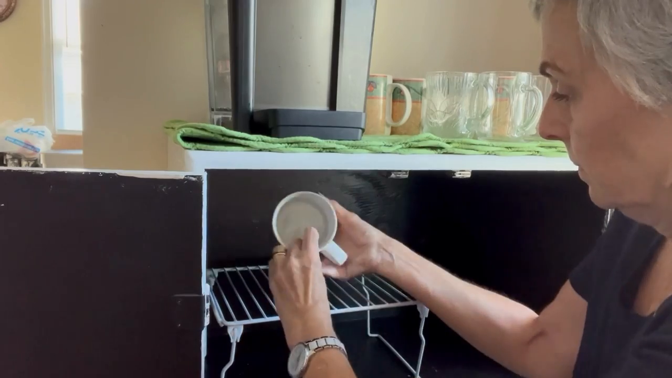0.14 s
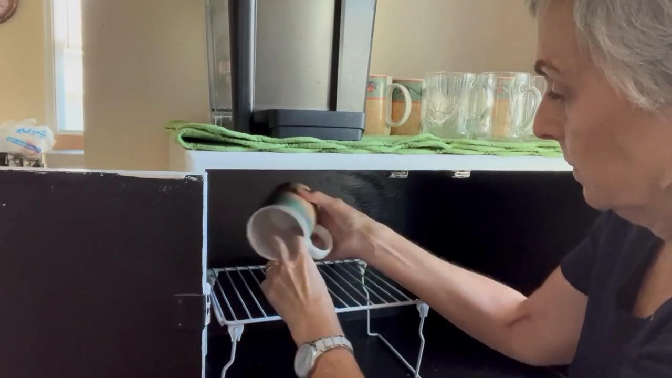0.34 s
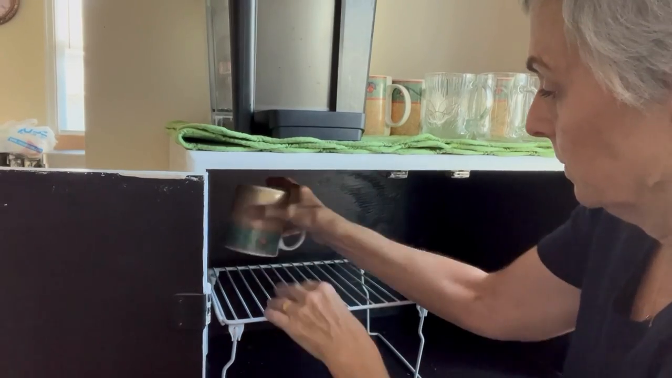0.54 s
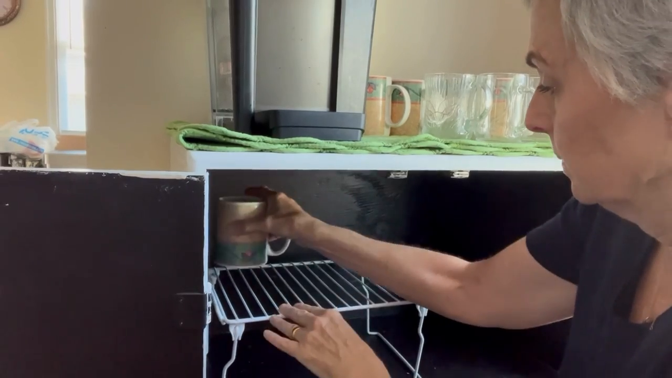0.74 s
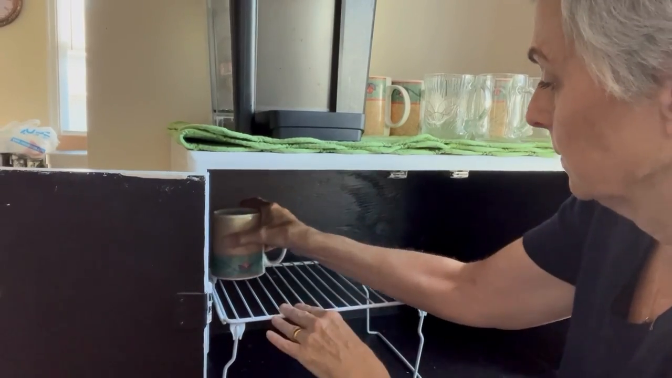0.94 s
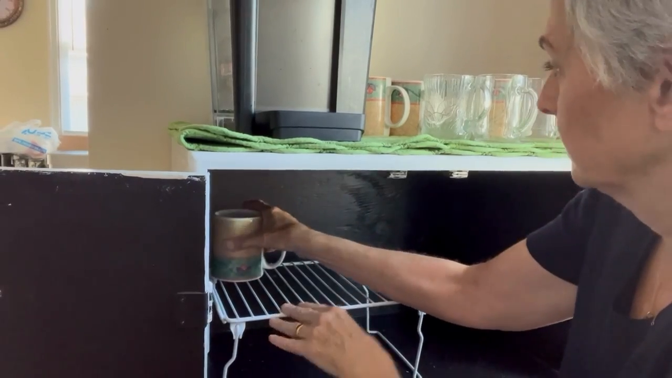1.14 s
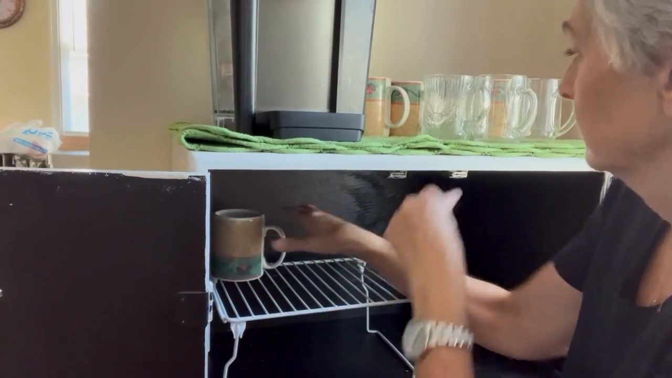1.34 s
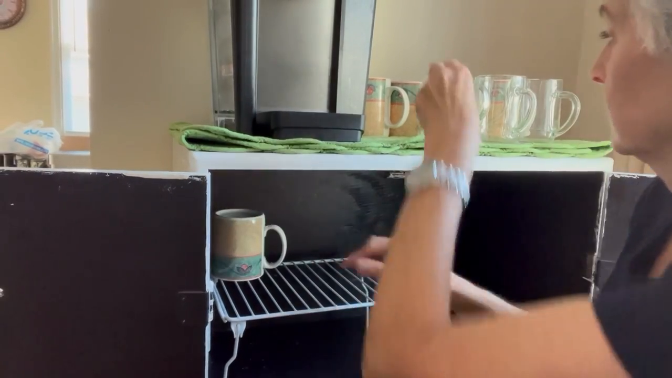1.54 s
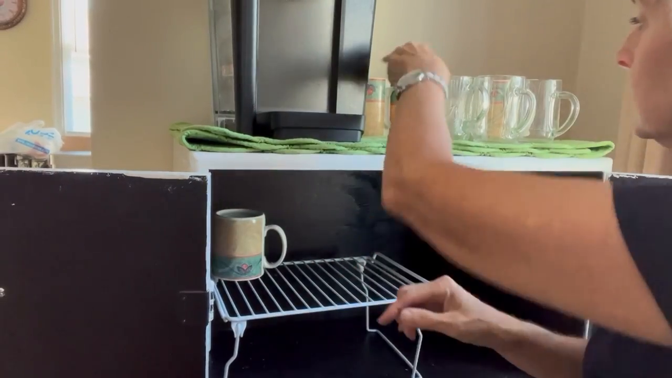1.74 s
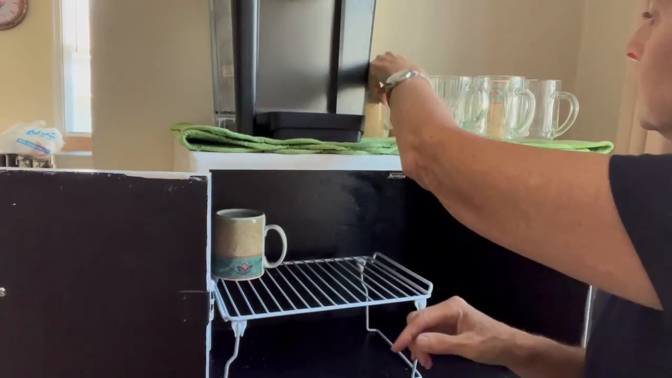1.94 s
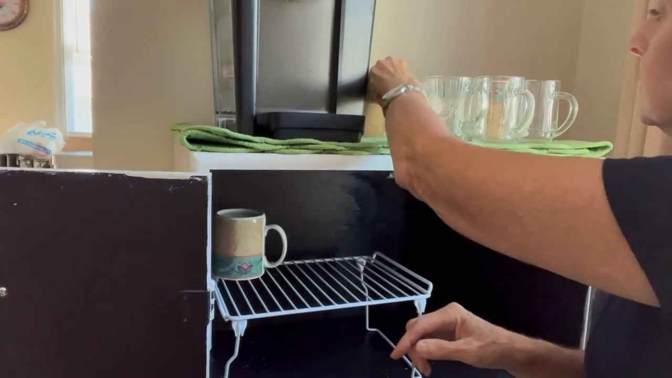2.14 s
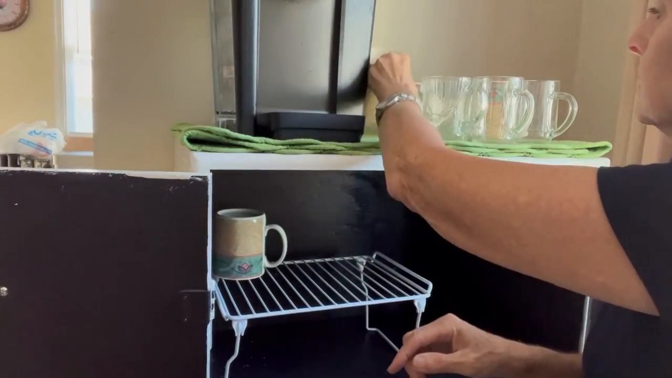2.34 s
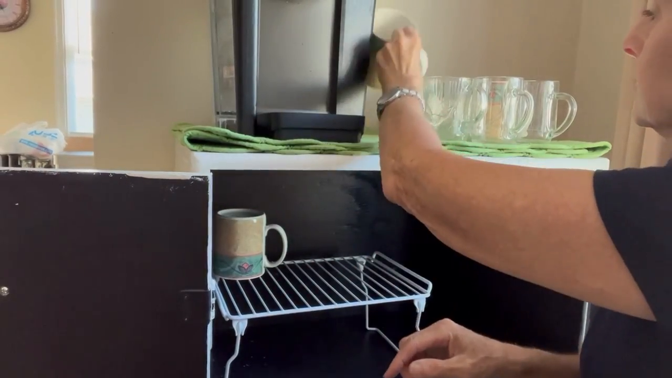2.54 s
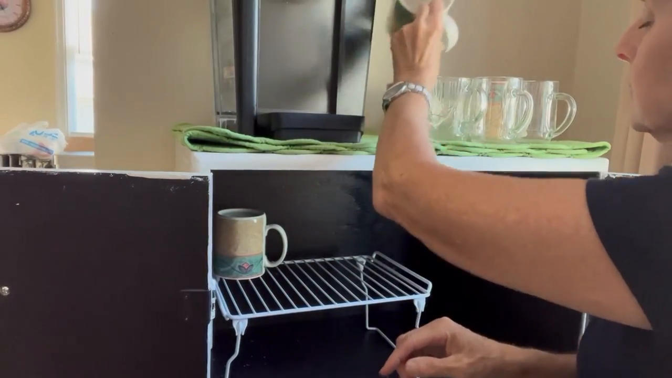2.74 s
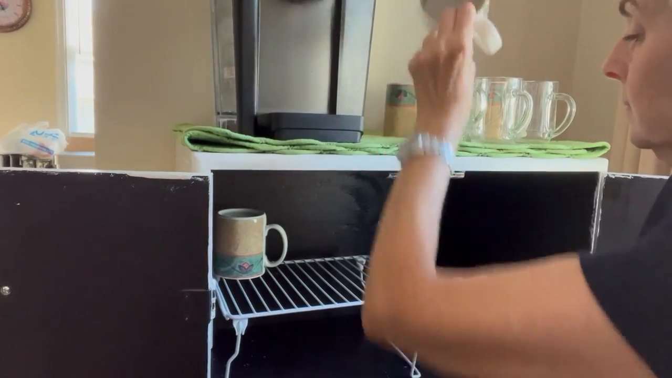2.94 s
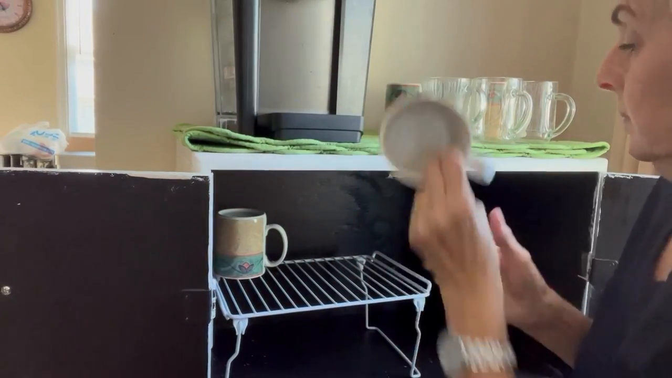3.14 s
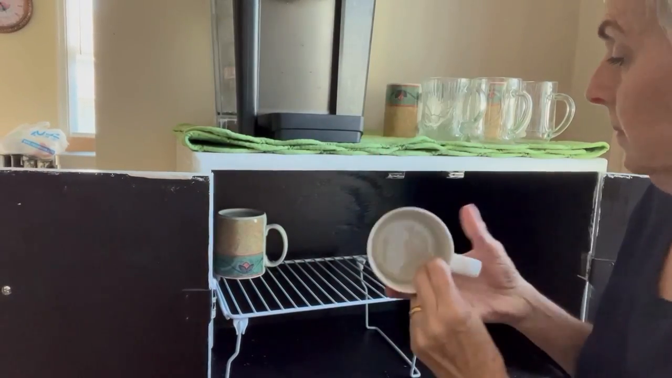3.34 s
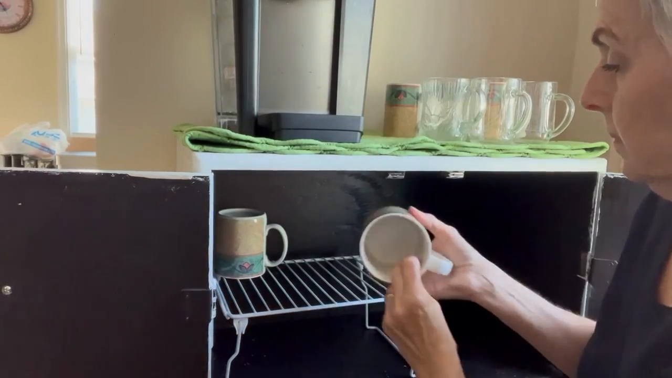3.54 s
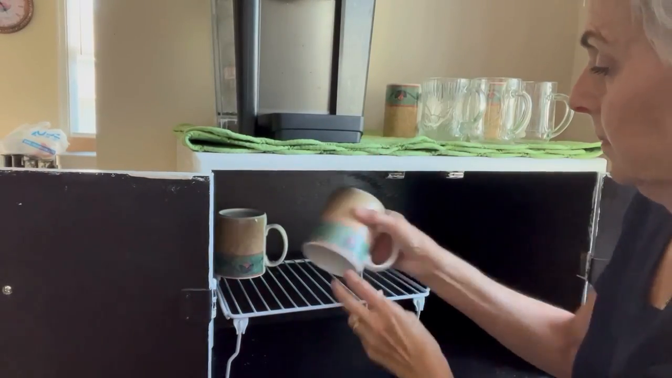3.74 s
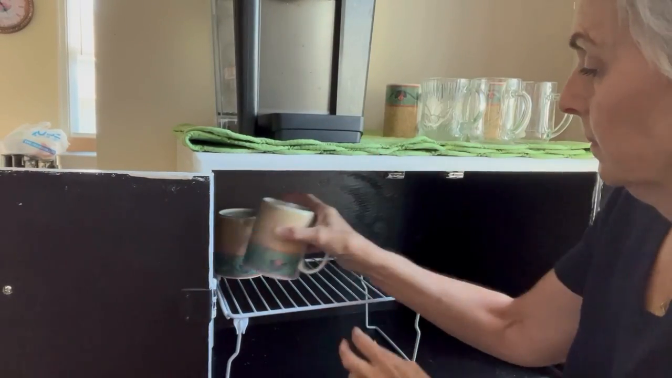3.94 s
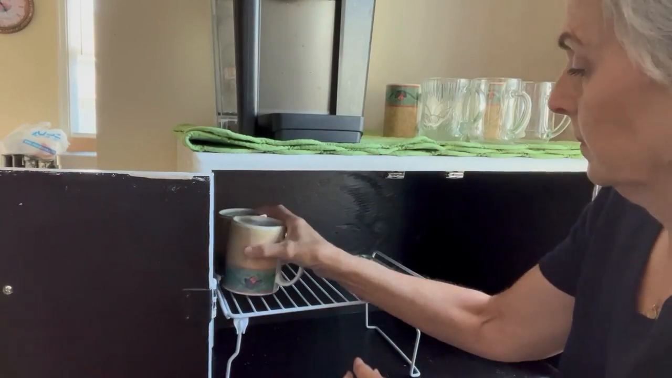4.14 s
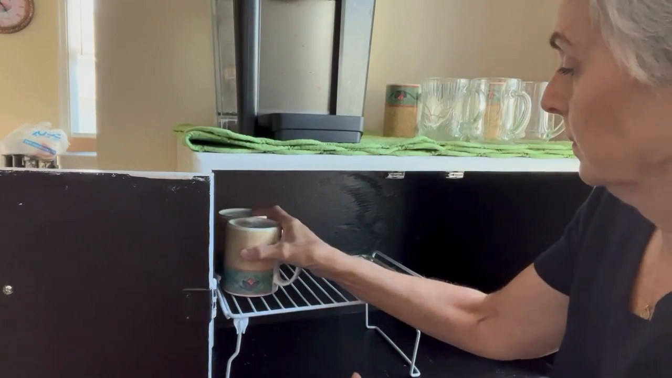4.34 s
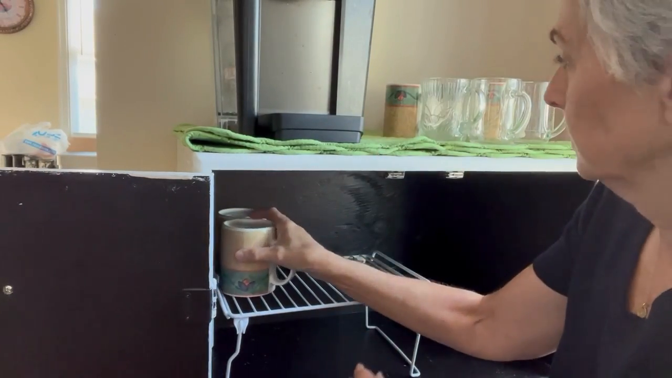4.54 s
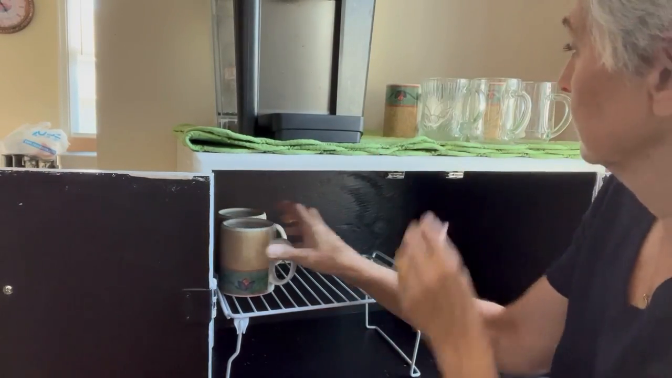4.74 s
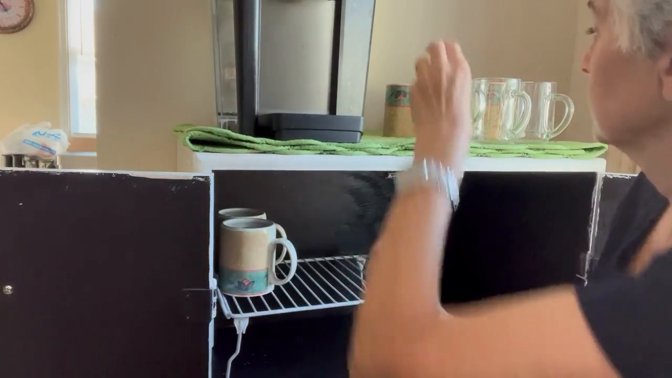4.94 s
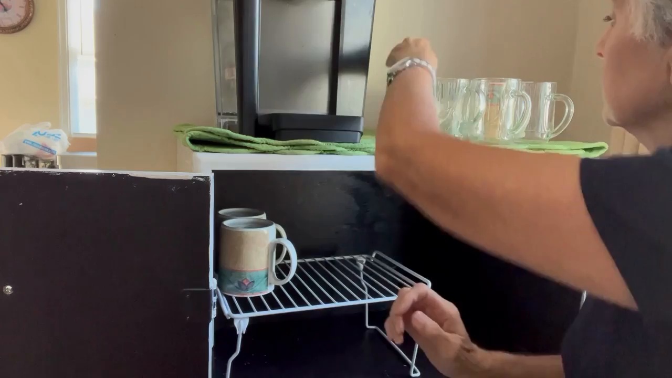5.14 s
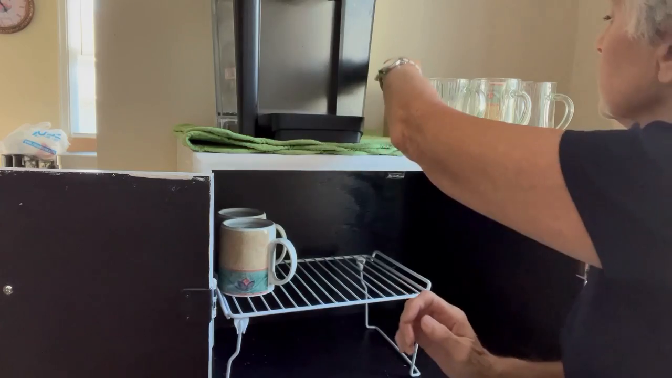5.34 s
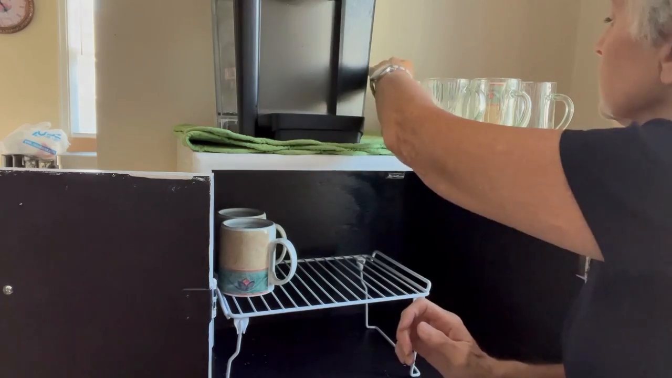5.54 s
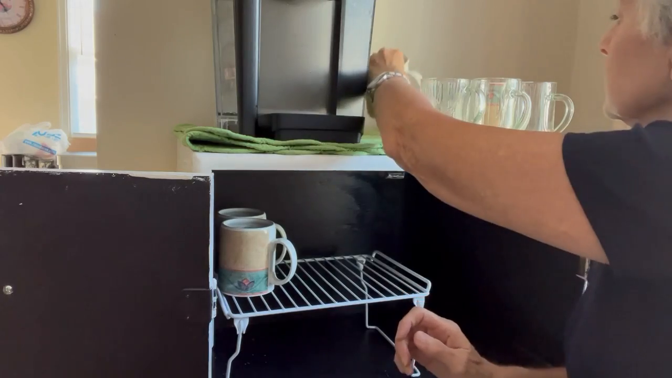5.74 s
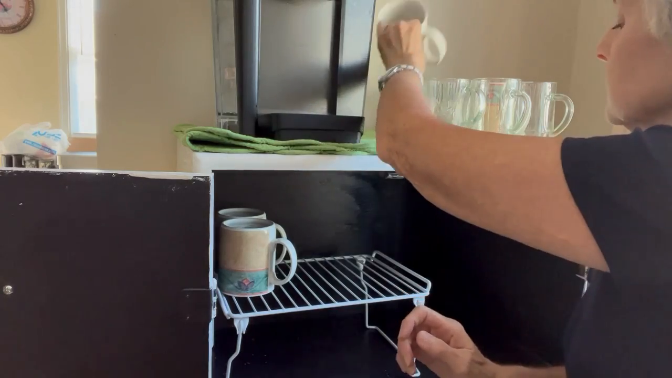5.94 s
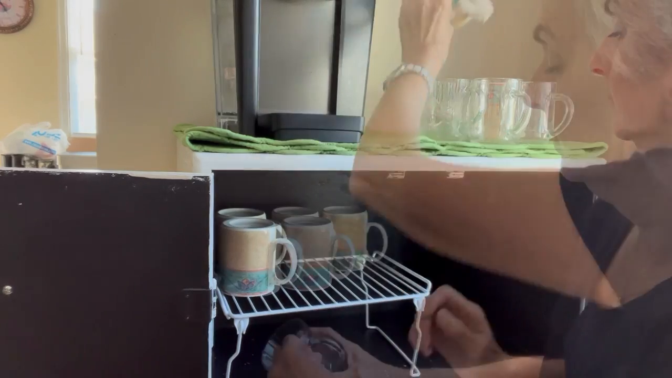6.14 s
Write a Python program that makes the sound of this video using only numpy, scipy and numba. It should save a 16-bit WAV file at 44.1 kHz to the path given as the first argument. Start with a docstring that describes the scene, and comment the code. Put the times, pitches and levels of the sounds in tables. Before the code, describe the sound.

Close, quiet small room with low hum and a faint clock tick. Fingers brush a mug, then it lands on a wire shelf in a quick metallic clatter. Another mug is tapped and dragged off a cloth with a thud, gritty scrape and high singing ring. It is set down softly and clinks sharply against the first, followed by faint finger rubs.

```python
"""Mugs moved onto a shelf

Ceramic mugs are turned in the fingers, dragged off a cloth-covered cabinet top and set on a wire shelf inside.
Mugs, shelf and cabinet are sets of fading tones, started by blows or fed by rubbing noise; most blows also rattle.
A clock ticks, mains hum and a far engine are sums of sine waves, and shaped noise is the air of a small room."""
import sys
import numpy as np
from scipy import signal
from scipy.fft import rfft, irfft, next_fast_len
from scipy.io import wavfile
from scipy.ndimage import uniform_filter1d
from numba import njit

SR = 44100
rng = np.random.default_rng(int(sys.argv[2]) if len(sys.argv) > 2 else 0)


def persist_wave(psi):
    """Save psi, clipped to +-1, as 16-bit WAV."""
    counts = np.round(np.clip(psi, -1, 1) * 32767).astype(np.int16)
    wavfile.write(sys.argv[1], SR, np.atleast_2d(counts).T)


def natural_amplitude(level_db):
    """Convert a level in decibels to a linear amplitude factor, elementwise."""
    exponent = np.asarray(level_db, float) / 20
    return 10 ** exponent


N = 272979  # length in samples
M = next_fast_len(N)  # padded length for fast filtering
T = np.arange(N) / SR  # time in seconds
F = np.fft.rfftfreq(M, 1 / SR) + 0.0009  # frequency in Hz, kept above zero for logarithms

# Tones of the mug lifted off the cloth. Each row: frequency in Hz, relative level in dB, 60 dB fade in seconds.
LIFTED_MUG = [(2492, -9, .12), (2557, -1, .48), (2605, -8, .06), (2697, -11, .4), (2880, -19, .12),
              (4250, -20, .25), (4484, -16, .45), (5430, -21, .28), (6896, -23, .1), (7440, -11, .2),
              (8190, -21, .1), (8455, -23, .12), (9146, -25, .1), (9545, -26, .2), (10400, -21, .22),
              (11050, -23, .1), (11210, -22, .14), (11610, -23, .15), (12830, -16, .13), (13350, -19, .14),
              (13680, -21, .1), (14675, -17, .13)]
# The same mug pressed down: shifted, shorter tones. Each row: frequency in Hz, relative level in dB,
# 60 dB fade in seconds.
PRESSED_MUG = [(2470, -14, .1), (2590, -4, .05), (2700, -6, .25), (2840, -11, .06), (3000, -14, .05),
               (3400, -17, .05), (3860, -20, .06), (4250, -23, .08), (5440, -16, .16), (6890, -22, .06),
               (7450, -11, .14), (8460, -30, .08), (9540, -26, .15), (10400, -21, .2), (11200, -25, .14),
               (11600, -29, .12), (12830, -17, .13), (13350, -23, .14), (13690, -26, .1), (14680, -20, .11)]
# Taps on that mug. Each row: start in seconds, ring level in dB, contact corner in Hz, rattle level in dB.
MUG_TAPS = [(1.997, -40.5, 12000, -40), (2.029, -59, 4970, -65), (2.136, -51, 12200, -50),
            (2.257, -47, 6740, -36.5), (2.358, -51, 5000, -52), (2.394, -47, 5000, -54),
            (2.49, -49, 6000, -43), (2.514, -45, 7030, -45), (2.545, -45, 4970, -45)]
# Mug foot dragged over the cloth: it creeps, is pulled harder, then lifts off.
# Each row: time in seconds, friction level in dB.
DRAG = [(2.132, -55), (2.174, -52), (2.25, -51), (2.32, -45.5), (2.36, -41.5), (2.41, -37.5), (2.45, -39.5),
        (2.53, -40), (2.57, -70)]
# Tone colour of the cloth noise. Each row: frequency in Hz, relative level in dB per Hz.
SCRAPE = [(200, 5.5), (400, 2), (900, -4), (1500, 3), (2100, -25), (3000, -2), (4000, -7.5), (7500, -18.5),
          (12000, -50), (16000, -43)]
# The rim sings under the drag, rising as the mug is pressed harder.
# Each row: time in seconds, pitch in Hz, rms level in dB; both waver a little.
RIM_SONG = [(2.14, 2555, -54), (2.19, 2564, -47.5), (2.26, 2560, -48), (2.33, 2572, -43), (2.38, 2586, -43),
            (2.425, 2608, -41), (2.47, 2595, -46), (2.53, 2560, -55)]
# Tones of the mug set on the shelf. Each row: frequency in Hz, relative level in dB, 60 dB fade in seconds.
SHELVED_MUGS = [(1480, -3, .022), (1846, -6, .025), (2417, -15, .1), (2482, 1, .1), (2495, -14, .35),
                (2615, 0, .09), (2645, -2, .1), (2638, -16, .4), (4290, -22, .05), (4334, -22, .36),
                (7192, -17, .09), (8021, -13, .13), (9232, -24, .1), (10470, -16, .13), (11060, -16, .13),
                (11380, -22, .12), (12950, -22, .12), (14440, -27, .12)]
# Tones of the neighbour it strikes, low ones damped by the wires. Each row: frequency in Hz, relative level
# in dB, 60 dB fade in seconds.
STRUCK_MUG = [(1244, -2, .02), (1530, -1, .018), (1846, -4, .02), (3280, -5, .02), (3596, -14, .04),
              (5335, -18, .17), (6589, -12, .12), (6654, -11, .11)]
# Mug against mug. Each row: start in seconds, ring level in dB, contact corner in Hz, rattle level in dB,
# neighbour's ring level in dB.
MUG_CLINKS = [(4.518, -55.5, 4000, -61.5, -70), (4.537, -27.5, 9220, -28.5, -32.5),
              (4.552, -37, 4000, -52, -51), (4.574, -45, 6070, -35, -29.5), (4.6008, -42, 7140, -35, -35.5),
              (4.626, -51, 5030, -48.5, -49)]
# The second mug sings faintly in the hand on its way in. Each row: time in seconds, rubbing level in dB.
CARRY = [(3.86, -90), (4.0, -91), (4.13, -85), (4.18, -80)]
# Tones of the shelf wires. Each row: frequency in Hz, relative level in dB, 60 dB fade in seconds.
SHELF_WIRES = [(988, -5, .1), (1190, -9, .06), (1340, -8, .07), (1701, -4, .075), (1793, -9, .07),
               (2000, -7, .04), (2089, -7, .04), (2186, -4, .08), (2471, -11, .05), (2643, -11, .1),
               (2970, -8, .05), (3180, -9, .04), (3580, -11, .05), (3780, -11, .05), (4150, -12, .03),
               (4296, -9, .05), (4550, -10, .03), (4800, -9, .03), (6000, -9, .035), (6270, -11, .04)]
# Tones of the shelf frame. Each row: frequency in Hz, relative level in dB, 60 dB fade in seconds.
SHELF_FRAME = [(188, -12, .15), (240, -9, .18), (342, 2, .13), (395, -2, .1), (443, -5, .12),
               (495, -7, .08), (571, -8, .08), (672, 0, .09), (743, -8, .06)]
# Landings on the shelf. Each row: start in seconds, wire level in dB, contact corner in Hz, rattle level in dB,
# frame level in dB, pitch of the struck wire in Hz.
SHELF_KNOCKS = [(0.76, -66.5, 2220, -72, -62, 1800), (.951, -52.5, 8960, -49.5, -41, 4630),
                (.959, -49.5, 5000, -50.5, -28.5, 3000), (.966, -41.5, 3000, -51.5, -28, 1660),
                (.978, -46, 4000, -55, -27.5, 3000), (.992, -49, 2500, -60, -30.5, 1700),
                (1.008, -51, 2000, -61, -31.5, 1700), (1.025, -58, 1980, -59, -28.5, 1000),
                (1.041, -50, 9000, -50.5, -31.5, 4420), (1.05, -43.5, 4500, -50, -38, 2210),
                (1.068, -46.5, 3000, -60, -30, 2200), (1.197, -64.5, 2500, -67, -52, 1750),
                (4.197, -52, 6850, -61.5, -43, 4300), (4.207, -50.5, 3500, -63.5, -46, 1900),
                (4.307, -57.5, 2200, -66.5, -49.5, 1700), (4.432, -52.5, 3460, -59.5, -46.5, 2040),
                (4.447, -53, 3000, -59.5, -48, 1400), (4.472, -49.5, 2500, -59, -43.5, 1800),
                (4.49, -54.5, 2500, -61.5, -46, 1400)]
# Tones of a loose shelf leg. Each row: frequency in Hz, relative level in dB, 60 dB fade in seconds.
SHELF_LEG = [(1102, 0, 1.2), (1124, -9, 2.0), (1160, -6, .6), (1390, -13, 1.2), (2266, -10, .12),
             (2783, -11, .22)]
# Blows on the leg as the first mug settles. Each row: start in seconds, ring level in dB, contact corner in Hz.
LEG_BLOWS = [(.99, -56, 3000), (1.078, -44, 2520)]
# Tones of the cabinet. Each row: frequency in Hz, relative level in dB, 60 dB fade in seconds.
CABINET = [(143, -22, 0.05), (163.2, 4, 0.12), (239.4, -9.5, 0.35), (297.5, 16.5, 0.028),
           (328, -16.5, 0.11), (359.8, -2.5, 0.2), (414, 0.5, 0.091), (553.6, -3, 0.073), (717, 8, 0.028),
           (1070, -20.5, 0.27), (1480, -27.5, 0.22)]
# Thuds on the cabinet. Each row: start in seconds, ring level in dB, contact corner in Hz.
CABINET_THUDS = [(.763, -24.5, 300), (0.776, -28, 250), (0.799, -31, 250), (2.258, -23.5, 800),
                 (2.269, -26.5, 700), (2.283, -30.5, 795), (2.311, -31, 800), (2.346, -32.5, 796),
                 (2.362, -36.5, 800)]
# Tones of a mug gripped in the hand. Each row: frequency in Hz, relative level in dB, 60 dB fade in seconds.
HELD_MUG = [(2000, -7, .015), (3400, -12, .015), (5200, -10, .08), (6250, -13, .05), (7200, -9, .08),
            (8100, -8, .08), (9146, 0, .1), (10300, -13, .08), (13680, -1, .1), (14750, -7, .06)]
# Fingernails on the mug. Each row: start in seconds, ring level in dB, contact corner in Hz, rattle level in dB.
NAIL_TAPS = [(.165, -49, 14200, -55), (0.372, -78, 14000, -83.5)]
# Fingers slipping on the glaze. Each row: start in seconds, hold in seconds, level in dB,
# share that rings the mug from 0 to 1, darkness from 0 to 1.
FINGERS = [(0.051, 0.076, -65.5, 0.1, 0.08), (0.163, 0.0031, -54, 0.12, 0.38), (0.373, .01, -77, 0.7, .15),
           (1.94, 0.032, -75.5, 0.17, 0.65), (3.31, .065, -71, 0.54, 0), (3.415, 0.15, -71, 0.36, 0.09),
           (3.821, 0.034, -59, 0.1, 0), (3.94, .01, -74, .02, .05), (5.979, 0.069, -73, 0.14, 0),
           (6.052, 0.067, -57.5, 0, 0.12), (6.154, 0.039, -55.5, 0.01, 0.29)]
# Bright skin hiss. Each row: frequency in Hz, relative level in dB per Hz.
SKIN_BRIGHT = [(2000, -48), (5000, -31), (8000, -5), (11500, -6.5), (13500, 4), (15000, -3), (16000, 2.5)]
# Dark skin hiss. Each row: frequency in Hz, relative level in dB per Hz.
SKIN_DARK = [(1000, -19), (2200, 4.5), (4000, 6.5), (6500, 8), (9000, -54), (14000, -12)]
# Tones of a glass. Each row: frequency in Hz, relative level in dB, 60 dB fade in seconds.
GLASS = [(2650, 3.5, 0.11), (3000, -1, 0.082), (5400, -21, .06), (6500, -16, 0.08)]
# Taps on the glass. Each row: start in seconds, ring level in dB, contact corner in Hz, rattle level in dB.
GLASS_TAPS = [(5.236, -57, 8064, -73)]
# Tone colour of every rattle. Each row: frequency in Hz, relative level in dB per Hz.
RATTLE = [(200, -0.5), (700, 8), (1500, 7.5), (3000, -4), (6000, -8), (11000, -8.5), (16000, -11)]
# Tones of the clock case. Each row: frequency in Hz, relative level in dB, 60 dB fade in seconds.
CLOCK_CASE = [(3100, -7, .012), (3650, 0, .016), (4100, -4, .012), (5600, -11, .01)]
# How long the room's echo lasts. Each row: frequency in Hz, 60 dB fade in seconds.
ROOM_T60 = [(150, 0.47), (1000, 0.35), (4000, 0.21), (12000, 0.3)]
# Tone colour of the room's echo. Each row: frequency in Hz, level in dB.
ROOM_COLOUR = [(60, -13), (200, -3), (600, 7), (4000, 2.5), (8000, -3), (16000, -13.5)]
# What each source sends into the room, in dB: cabinet top, held mug, shelved mugs, shelf, cabinet.
ROOM_DB = (-8, -4.5, -9, -8, -8)
# Phase between the channels. Each row: frequency in Hz, lead of the right channel in radians.
CHANNEL_TURN = [(300, 0.044), (1400, 0.55), (2400, 1.4), (4500, 2.23), (6000, 2), (7500, .2), (16000, .05)]
# Far engine. Each row: time in seconds, firing rate in Hz, then the levels of orders one, two and three in dB;
# rate and levels waver a little.
ENGINE = [(1.4, 51.26, -56, -67, -70), (2.2, 52.73, -51, -78, -86), (2.52, 57.18, -44, -71, -47.5),
          (3.39, 58.6, -49.5, -50.5, -62), (3.55, 62.55, -53, -48, -66), (3.85, 64.86, -49.5, -48.5, -63.5),
          (4.6, 67.9, -57.5, -53, -62.5), (5.12, 68.66, -61, -45, -65), (5.75, 68.96, -60, -50.5, -68.5),
          (6.19, 66.3, -62, -60, -76)]
# Mains hum. Each row: frequency in Hz, rms level in dB, around which it drifts.
MAINS = [(60, -55), (120, -54)]
# Room air, sum of both channels. Each row: frequency in Hz, relative level in dB per Hz.
AIR_MID = [(15, -54.5), (25, -36.5), (40, -15.5), (58, -6), (92, -8.5), (130, -3.5), (170, -11), (256, -13),
           (400, -21), (659, -25.5), (850, -36.5), (1300, -45.5), (2410, -57), (5000, -62), (16000, -65)]
# Room air, difference of the channels. Each row: frequency in Hz, side minus mid in dB.
AIR_SIDE = [(60, -11.5), (110, -10), (200, -7), (380, -2), (700, 0.5), (1290, 0.5), (2380, 1), (4400, 1.5),
            (8120, -8.5), (15000, -7.5)]
# Low resonances of the room. Each row: frequency in Hz, width in Hz, boost in dB.
AIR_MODES = [(74.7, 16, 8), (258, 27, 6), (308, 20, 4.5), (386.8, 21, 14), (491.5, 20, 7), (660, 17, 12),
             (705, 26, 11.5), (1110, 51, 5)]

TAP_FADE_S = 0.0084  # how fast the rattle of a light tap dies away


def on_log(hz, table):
    """Read a table of Hz and value on a log-frequency axis."""
    table_hz, value = np.transpose(table)
    return np.interp(np.log(hz), np.log(table_hz), value)


def colour(x, table, top_hz=99200.0):
    """Filter by a dB shape scaled so that white noise keeps its level, rounding off above top_hz."""
    n = next_fast_len(len(x))
    hz = np.fft.rfftfreq(n, 1 / SR) + 1e-3
    gain = natural_amplitude(on_log(hz, table)) / (1 + (hz / top_hz) ** 2)
    gain = gain / np.sqrt(np.mean(gain ** 2))
    return irfft(rfft(x, n) * gain, n)[:len(x)]


def track(table):
    """Read curves against time; also give a soft-edged gate that is 1 inside their span and 0 outside."""
    s, *columns = np.transpose(table)
    inside = uniform_filter1d(((T > s[0]) & (T < s[-1])) * 1., size=600)
    return inside, [np.interp(T, s, column) for column in columns]


def walk(rate):
    """Smooth random wandering: levels held for 1 / rate seconds, then averaged twice."""
    hold = int(SR / rate)
    steps = np.repeat(rng.standard_normal(N // hold + 1), hold)
    return 1.36 * uniform_filter1d(uniform_filter1d(steps, hold), hold)[:N]


def pair(x, pan_db):
    """Make left and right: left is louder by pan_db, and the phase of the upper mids differs between them."""
    turn = np.exp(.5j * on_log(F, CHANNEL_TURN) * np.array([[-1], [1]]))
    return irfft(rfft(x, M) * turn, M)[:, :N] * natural_amplitude(np.array([[pan_db], [-pan_db]]) / 2)


@njit
def resonate(poles, gains, at, kicks, slack, rub):
    """Damped rotating phasors: each blow hands over its energy during the contact, rubbing feeds them steadily."""
    out = np.zeros(len(rub))
    for k in range(len(poles)):
        z, push, keep, blow = 0j, 0j, 0., 0
        feed = np.sqrt(1 - abs(poles[k]))
        for i in range(len(rub)):
            if blow < len(at) and i == at[blow]:
                push = push + kicks[blow, k] * (1 - slack[blow])
                keep = slack[blow]
                blow = blow + 1
            # the tiny 1e-18 keeps numbers from becoming too small to compute quickly
            z = z * poles[k] + push + feed * rub[i] + 1e-18
            push = push * poles[k] * keep + 1e-18
            out[i] += gains[k] * z.imag
    return out


def ring(modes, s, ring_db, contact_hz, rub=np.zeros(N), scatter_db=-0.5, place_db=0.):
    """Each blow excites every tone by its own random amount; softer contacts last longer and reach fewer highs."""
    hz, db, t60 = np.transpose(modes)
    luck = rng.standard_normal((len(s), len(modes), 2))
    reach = 1 / (1 + (hz / contact_hz[:, None]) ** 2)
    strength = natural_amplitude(ring_db[:, None] + scatter_db * luck[..., 0] + place_db)
    kicks = strength * np.exp(.6j * luck[..., 1]) * reach
    poles = np.exp(2j * np.pi * hz / SR - np.log(1000) / (t60 * SR))
    slack = np.exp(-.4 * contact_hz / SR)  # share of the push left after each sample
    return resonate(poles, natural_amplitude(db), (s * SR).astype(np.int64), kicks, slack, rub)


def rattle(s, contact_hz, db, fade_s):
    """The dense chatter of small contacts after each blow: coloured noise that rises fast and dies away."""
    out, t = np.zeros(N), np.arange(SR // 4) / SR
    fades = np.broadcast_to(fade_s, len(s))
    noises = rng.standard_normal((len(s), len(t)))
    for start, top_hz, size, fade, noise in zip(s, contact_hz, natural_amplitude(db), fades, noises):
        at = int(start * SR)
        shape = (1 - np.exp(-t * top_hz * 0.34)) * np.exp(-t / fade)
        out[at:at + len(t)] += size * shape * colour(noise, RATTLE, top_hz)
    return out


def struck(modes, blows, fade_s, rub=0., scatter_db=5.0, place_db=0.):
    """A body rings under its blows; the rattle after each keeps shaking it, which roughens the ring."""
    s, ring_db, contact_hz, rattle_db = np.transpose(blows)[:4]
    chatter = rattle(s, contact_hz, rattle_db, fade_s)
    shaking = rub + natural_amplitude(-14.0) * chatter
    return ring(modes, s, ring_db, contact_hz, shaking, scatter_db, place_db) + chatter


def lifted_mug():
    """Taps and gritty friction on cloth feed the free tones; friction alone feeds the shifted, shorter pressed tones."""
    inside, (friction_db,) = track(DRAG)
    noise, chance, size = rng.standard_normal(N), rng.random(N), rng.exponential(size=N)
    # grains caught under the foot: 1500 a second on average, of random size
    hits = (chance < 1500 / SR) * natural_amplitude(2.5 * size)
    grains = signal.lfilter([1], [1, -np.exp(-1 / (0.00042 * SR))], hits)
    grit = inside * noise * (0.29 + grains / grains.std()) * natural_amplitude(-2.5 + 1.6 * walk(34.88))
    friction = natural_amplitude(friction_db)
    rub, none = friction * grit, np.zeros(0)
    free = struck(LIFTED_MUG, MUG_TAPS, TAP_FADE_S, natural_amplitude(-9.0) * rub)
    pressed = ring(PRESSED_MUG, none, none, none, rub)
    cloth = natural_amplitude(-4.5) * friction * colour(grit, SCRAPE)
    return free + pressed + cloth


def rim_song():
    """Stick-slip locks onto the rim's lowest mode: a sine tone, slightly unsteady in pitch and level."""
    inside, (hz, db) = track(RIM_SONG)
    turn = 2 * np.pi * np.cumsum(hz * (1 + 0.00198 * walk(60.1))) / SR
    return np.sqrt(2) * inside * natural_amplitude(db + 1.6 * walk(70)) * np.sin(turn)


def shelved_mugs():
    """One mug knocks against the other and bounces, so both ring; rubbing in the hand also feeds the first."""
    inside, (rub_db,) = track(CARRY)
    s, _, contact_hz, _, other_db = np.transpose(MUG_CLINKS)
    rub = inside * natural_amplitude(rub_db + 3.0 * walk(14)) * rng.standard_normal(N)
    first = struck(SHELVED_MUGS, MUG_CLINKS, 0.0031, rub)  # rattle fade in seconds
    return first + ring(STRUCK_MUG, s, other_db, contact_hz, scatter_db=0.5)


def shelf():
    """Landings and clinks make the wires ring and buzz and shake the frame; two blows set a loose leg singing."""
    knock_fade_s, jolt_fade_s, jolt_hz = 0.024, 0.011, 3000
    # a clink jolts the shelf under the mugs: wires, rattle and frame follow the clink's rattle level
    jolts = [(s, db - 21, jolt_hz, db - 15.5, db - 25, jolt_hz) for s, _, _, db, _ in MUG_CLINKS]
    blows = sorted(SHELF_KNOCKS + jolts)
    fade_s = [jolt_fade_s if row in jolts else knock_fade_s for row in blows]
    s, *_, frame_db, wire_hz = np.transpose(blows)
    # the wire under the contact rings up to 7 dB louder, and so do those near it in pitch
    octaves_away = np.log2(np.array(SHELF_WIRES)[:, 0] / wire_hz[:, None])
    place_db = 7 * np.exp(-(octaves_away / 0.28) ** 2)
    wires = struck(SHELF_WIRES, blows, fade_s, scatter_db=2.0, place_db=place_db)
    frame = ring(SHELF_FRAME, s, frame_db, np.full(len(s), 1300.))
    return wires + frame + ring(SHELF_LEG, *np.transpose(LEG_BLOWS))


def cabinet():
    """Soft thuds make the cabinet boom at its own low tones."""
    return ring(CABINET, *np.transpose(CABINET_THUDS))


def held_mug():
    """Skin hisses on the glaze and nails tap; the grip damps the low tones and lets the high ones whisper."""
    skin = rng.standard_normal(N) * natural_amplitude(5.0 * walk(49))
    bright, dull = colour(skin, SKIN_BRIGHT), colour(skin, SKIN_DARK)
    hiss = rub = 0
    for s, hold, db, share, dark in FINGERS:
        share, dark = np.clip(share, 0, 1), np.clip(dark, 0, 1)
        rise_db = 1800 * np.maximum(s - T, 0)  # slopes in dB per second
        fall_db = 386 * np.maximum(T - s - hold, 0)
        slip = natural_amplitude(db - rise_db - fall_db)
        hiss = hiss + slip * (1 - share) * ((1 - dark) * bright + dark * dull)
        rub = rub + slip * natural_amplitude(-2) * share * skin
    return struck(HELD_MUG, NAIL_TAPS, TAP_FADE_S, rub) + hiss


def glass():
    """A faint tap makes a glass ring, with a short rattle."""
    return struck(GLASS, GLASS_TAPS, TAP_FADE_S)


def clock():
    """Faint ticks about a second apart, as of a movement whirring briefly in its case; they stop before the end."""
    s = .795 + 1.002 * np.arange(5)  # five ticks, in seconds
    contact_hz = np.full(len(s), 9000.)
    ring_db, whir_db = np.full(len(s), -69.), np.full(len(s), -74.)
    whir = rattle(s, contact_hz, whir_db, .031)
    return ring(CLOCK_CASE, s, ring_db, contact_hz, whir, scatter_db=2.5)


def room(x):
    """Echo from decaying noise in octave bands, unrelated left and right; extreme lows and highs return weaker."""
    t = np.arange(SR // 2) / SR
    tail = 0
    for hz in 63 * 2. ** np.arange(8):
        edges = [hz / np.sqrt(2), hz * np.sqrt(2) if hz < 8000 else 20000]
        octave = signal.butter(2, edges, "band", fs=SR, output="sos")
        band = signal.sosfilt(octave, rng.standard_normal((2, len(t))))
        tail = tail + band * natural_amplitude(-60 * t / on_log(hz, ROOM_T60))
    tail = tail * np.clip(t / 0.0012, 0, 1)
    tail = tail / np.sqrt(np.sum(tail ** 2) / 2)
    x = irfft(rfft(x, M) * natural_amplitude(on_log(F, ROOM_COLOUR)), M)[:N]
    return signal.fftconvolve(x[None], tail, axes=1)[:, :N]


def hum():
    """Sine waves for the mains and for three orders of an engine outside that speeds up, then eases slightly."""
    inside, (hz, *order_db) = track(ENGINE)
    turn = 2 * np.pi * np.cumsum(hz * (1 + 0.006 * walk(6.02))) / SR
    engine = sum(natural_amplitude(db + 1.6 * walk(9.7)) * np.sin((k + 1) * turn + k) for k, db in enumerate(order_db))
    mains = sum(natural_amplitude(db + 3.24 * walk(3.7)) * np.sin(2 * np.pi * line_hz * T) for line_hz, db in MAINS)
    return np.sqrt(2) * (inside * engine + mains)


def air():
    """Building rumble: noise shaped by the room's low resonances; part of the side is the mid a quarter cycle on."""
    resonance_db = sum(boost / (1 + (2 * (F - hz) / width) ** 2) for hz, width, boost in AIR_MODES)
    db = on_log(F, AIR_MID) + resonance_db
    a, b = rfft(rng.standard_normal((2, M)))
    turned = 0.84  # amplitude share of the side that follows the mid
    side_noise = turned * 1j * a + np.sqrt(1 - turned ** 2) * b
    mid = irfft(a * natural_amplitude(db), M)[:N]
    side = irfft(side_noise * natural_amplitude(db + on_log(F, AIR_SIDE)), M)[:N]
    gain = natural_amplitude(-46.5 + 0.62 * walk(9)) / mid.std()
    return gain * np.array([mid + side, mid - side])


def scene():
    """Near sources are heard directly and again through the room; the clock is only heard through the room."""
    top = lifted_mug() + rim_song() + glass()
    held, mugs, wires, boom = held_mug(), shelved_mugs(), shelf(), cabinet()
    direct = pair(top, 0.25) + pair(held, .1) + pair(mugs, -2.77) + pair(wires, 1.2) + pair(boom, 1.2)
    sent = natural_amplitude(np.array(ROOM_DB)) @ np.array([top, held, mugs, wires, boom])
    wet = room(sent + clock())
    return direct + wet + pair(hum(), 0.35) + air()


def top_cut(x):
    """Nothing passes above the cut-off."""
    return signal.sosfilt(signal.butter(12, 16400, fs=SR, output="sos"), x)


def record(dry):
    """A steep filter cuts the top above 15.8 kHz to finish the mix."""
    low_pass = signal.ellip(8, .2, 60, 15800, fs=SR, output="sos")
    mix = signal.sosfilt(low_pass, dry)
    return top_cut(mix)


dry = scene()
out = record(dry)
persist_wave(out)
```